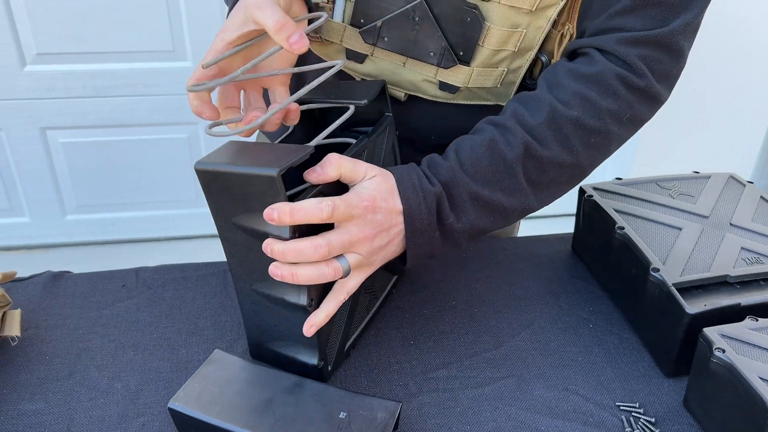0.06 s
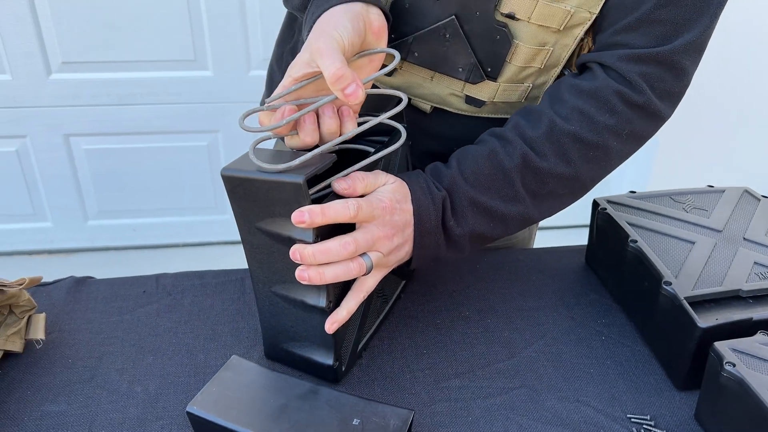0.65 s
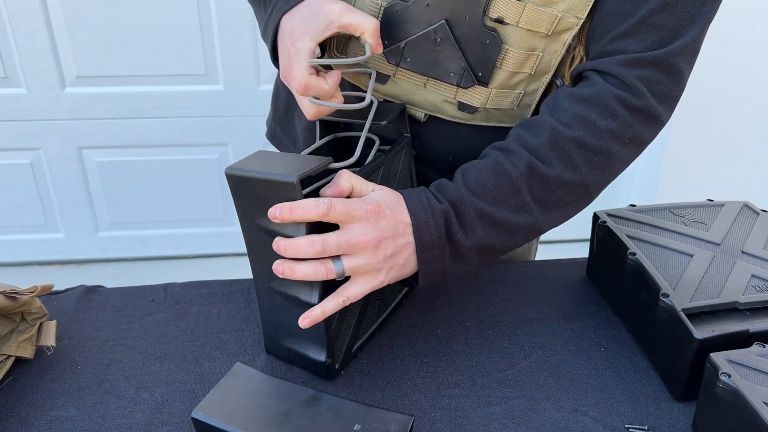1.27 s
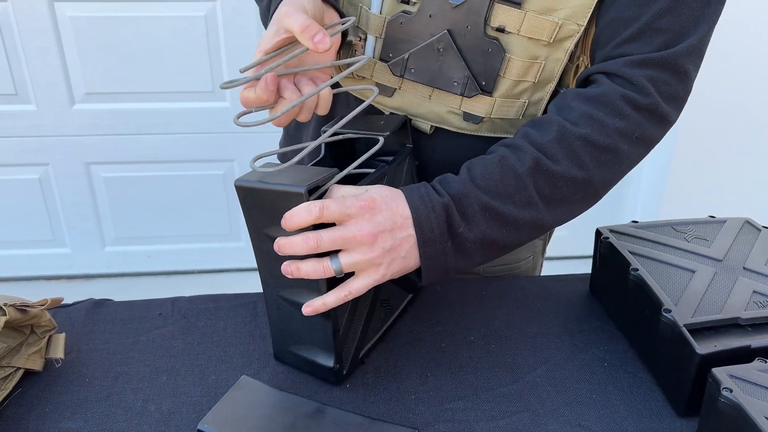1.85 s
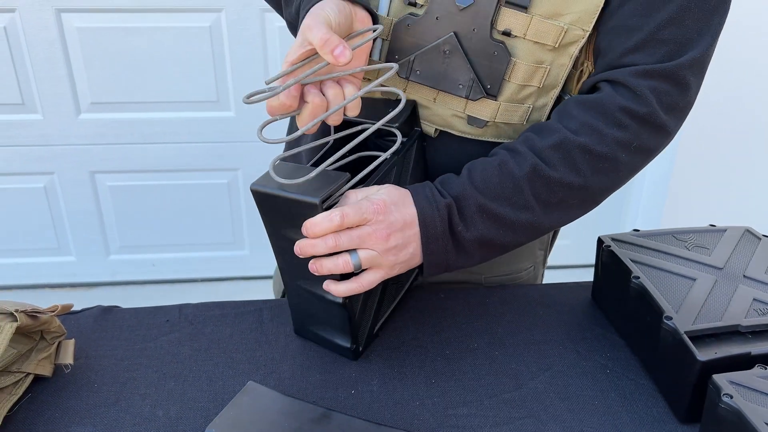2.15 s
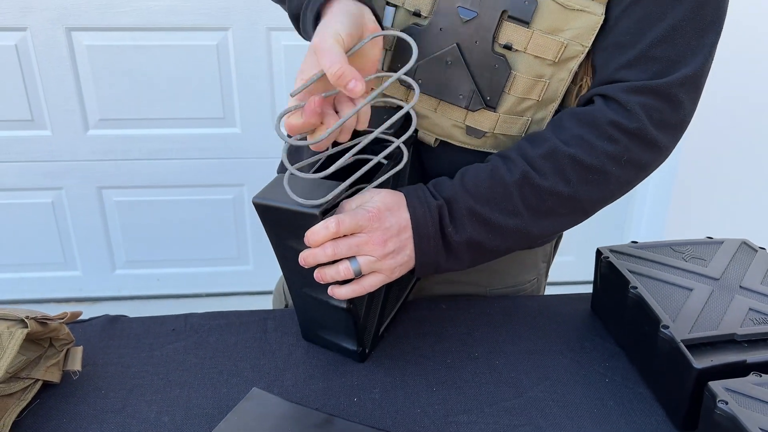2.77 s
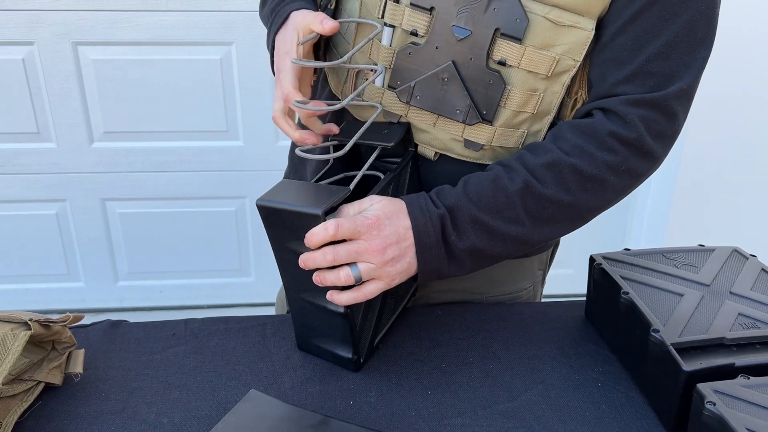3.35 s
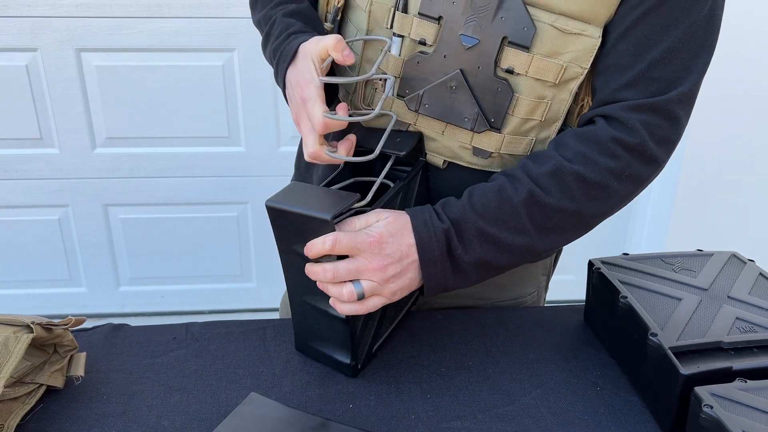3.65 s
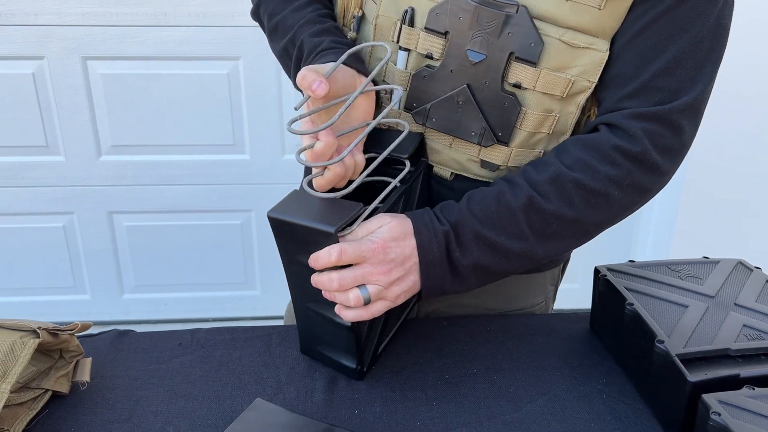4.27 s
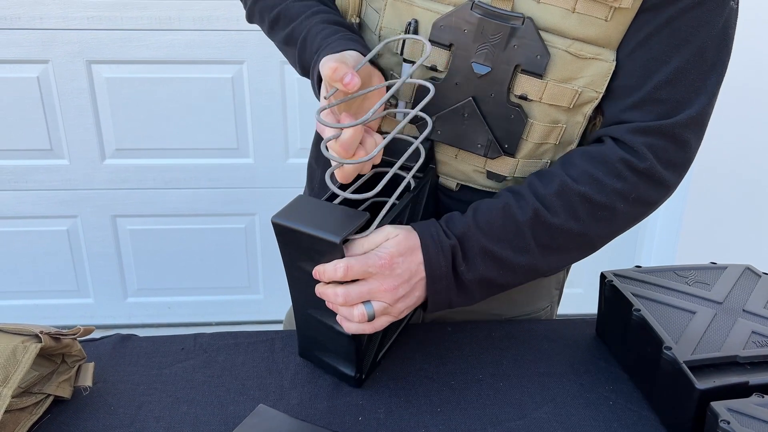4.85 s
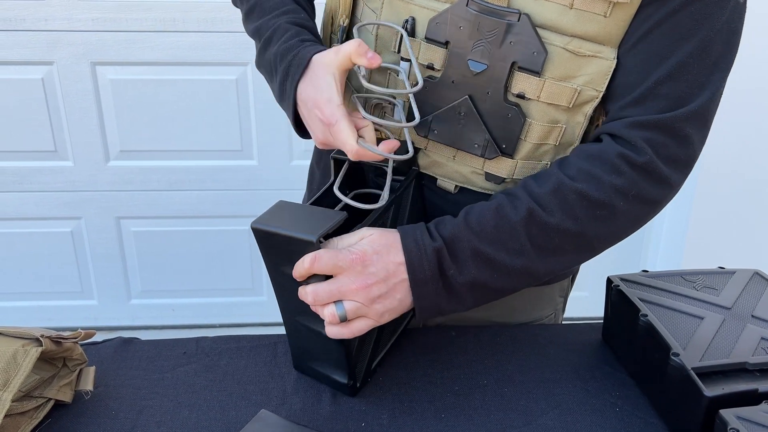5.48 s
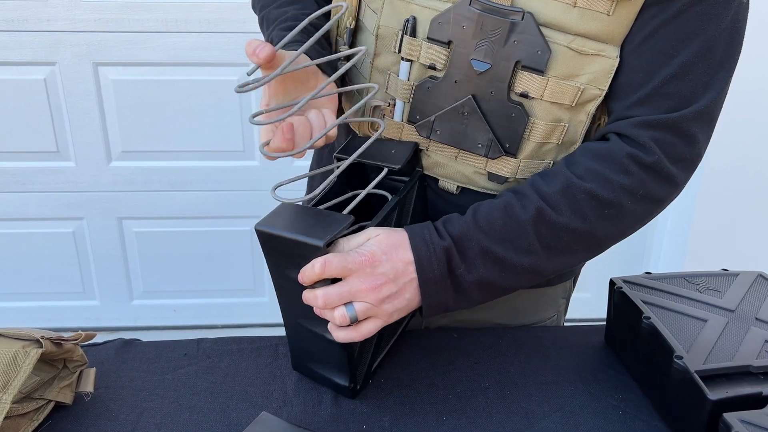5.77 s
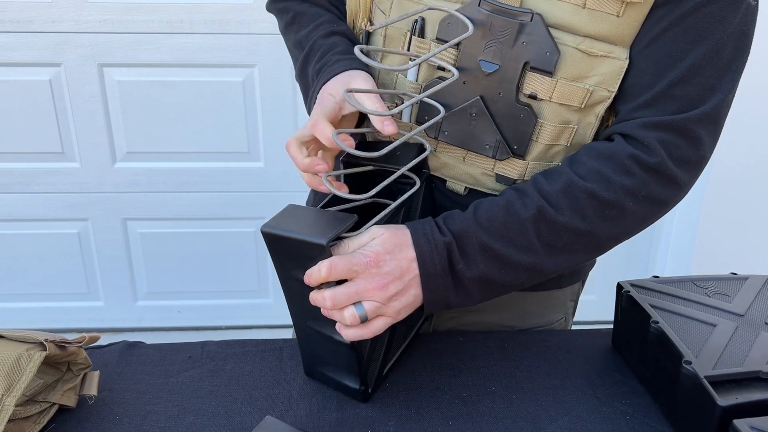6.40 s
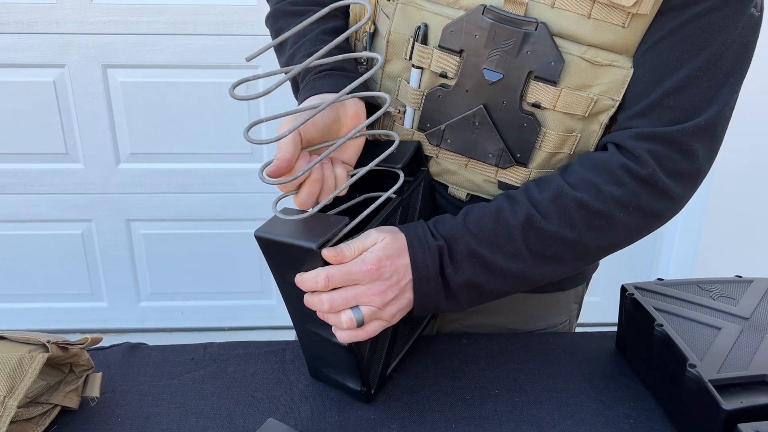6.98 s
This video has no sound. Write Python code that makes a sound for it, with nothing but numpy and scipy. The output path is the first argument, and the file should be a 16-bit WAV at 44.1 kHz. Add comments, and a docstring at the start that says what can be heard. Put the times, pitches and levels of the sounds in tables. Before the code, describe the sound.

Clusters of clicks, hollow knocks and scrapes as metal coils catch on a plastic box and snap free, pulled by hand.

```python
"""Ticks, clacks and hollow booms come in clusters over a scrape: a long steel wire spring is being
rocked and drawn by hand out of a hollow plastic housing, outdoors. Its coils slide along the walls by
stick-slip friction, catch on the rim and snap free. Each impact excites the damped modes of the plastic,
the resonance of the cavity and, faintly, the modes of the wire. Hands rumble and a sleeve rustles."""
import sys
import numpy as np
from scipy import signal
from scipy.fft import rfft, irfft, next_fast_len
from scipy.io import wavfile
from scipy.ndimage import uniform_filter1d, map_coordinates

SR = 44100
rng = np.random.default_rng(int(sys.argv[2]) if len(sys.argv) > 2 else 0)


def dump_mix(stems):
    """Bounce the given channels to the path in sys.argv[1] as a 16-bit WAV at rate SR."""
    frames = np.atleast_2d(stems).T  # one column per channel
    limited = np.clip(frames, -1, 1)  # hard clip at full scale
    pcm = np.round(limited * 32767).astype(np.int16)
    wavfile.write(sys.argv[1], SR, pcm)


N = 314433

# impacts of a coil on the housing: t/s, boom f/Hz, boom level/dB, clack level/dB, tick over clack/dB
CONTACTS = [(0.045, 333, -29, -29.5, -9.5), (0.0494, 354, -20.5, -25, -12), (0.0635, 285, -29.5, -32, -32),
            (0.1491, 340, -33.5, -35.5, -21), (0.1784, 319, -18, -22.5, -8.5),
            (0.202, 358, -31.5, -43.5, -11), (.302, 338, -46, -65, -1), (0.7426, 332, -46, -53, -16),
            (0.9473, 360, -23, -27, -10), (1.0037, 331, -37, -29.5, -11.5), (1.021, 315, -23, -33, -11),
            (1.0471, 365, -35, -25.5, -3.5), (1.0595, 330, -27.5, -30.5, -16),
            (1.0825, 370, -33, -24, -13.5), (1.1017, 345, -29, -26, -12), (1.1292, 350, -37, -41, -19),
            (1.1879, 351, -22, -22, -9), (1.1929, 326, -33.5, -30, -3.5), (1.2092, 361, -29, -29.5, -19),
            (1.236, 340, -37.5, -32, -5), (1.2769, 338, -29, -33.5, -10.5), (1.2874, 352, -27.5, -39.5, -5),
            (1.3315, 383, -35.5, -29.5, -8.5), (1.406, 310, -42.5, -33, -21), (1.4346, 288, -21.5, -26, -9),
            (1.4441, 315, -28.5, -27, -6.5), (1.4576, 337, -23.5, -27.5, -3.5),
            (1.467, 339, -25, -28.5, -9), (1.4926, 341, -22.5, -33.5, -9), (1.5206, 332, -23, -44.5, 2),
            (1.5441, 397, -26.5, -36.5, -14), (1.58, 286, -22.5, -34.5, -8),
            (1.5895, 305, -21, -22.5, -5.5), (1.6081, 377, -27, -30, -18),
            (1.6167, 356, -22.5, -31.5, -8.5), (1.6493, 347, -37, -42, 1.5), (1.6636, 362, -32.5, -41, -6),
            (1.7079, 353, -34, -32.5, -13.5), (1.7282, 380, -38, -39, -22), (1.817, 353, -52.5, -42.5, -28),
            (1.91, 308, -23.5, -30.5, -12.5), (2.231, 337, -42, -68, -14), (2.3647, 290, -42, -42.5, -10.5),
            (2.3932, 343.4, -25, -31, -12), (2.4011, 344.5, -20, -40, -11), (2.629, 362, -25, -45, -8.5),
            (2.6427, 370, -25.5, -43.5, -16.5), (2.6599, 339.5, -24.5, -62.5, -14),
            (2.854, 344, -29, -26.5, -5.5), (2.8747, 318, -25.5, -33.5, -18), (2.921, 346, -23.5, -47, -1),
            (2.9297, 343, -19, -24.5, -6), (2.9637, 360, -28.5, -33.5, -14.5),
            (3.0206, 390, -39.5, -47.5, -24), (3.0951, 302, -38.5, -40, -16.5), (3.1664, 310, -67, -52, 2),
            (3.2235, 306, -35, -35, -14), (3.2453, 340, -34, -41.5, -34), (3.3216, 320.6, -27, -31, -12.5),
            (3.419, 365, -37, -45, -20), (3.555, 346, -36, -41.5, -19), (3.5816, 324, -23, -31, -9.5),
            (3.6977, 353, -34.5, -41, -14.5), (3.7132, 354, -27, -37.5, -21), (4.1509, 366, -17.5, -23, -8),
            (4.214, 311, -37.5, -47, -14), (4.2322, 320, -37, -50, -17), (4.3439, 298, -46, -58, -36),
            (4.408, 339, -21.5, -24.5, -5.5), (4.4124, 358.6, -15.5, -38, -1.5),
            (4.447, 366, -27.5, -49, -15), (4.601, 319, -35.5, -52, -12), (4.6385, 308.6, -21, -51.5, -6),
            (4.8908, 325, -30.5, -40.5, -24), (4.9305, 330, -29, -45.5, -8), (4.9621, 347, -22, -24, -9.5),
            (4.9882, 320, -20.5, -31, -16.5), (5.056, 362, -24.5, -30.5, -8.5),
            (5.062, 365, -24, -34.5, -17.5), (5.0897, 360, -43, -34, -13), (5.1082, 362, -28.5, -43.5, -15),
            (5.1518, 360, -27.5, -38.5, -7), (5.1969, 339, -33.5, -45, -9.5),
            (5.3674, 352, -54.5, -27.5, -12), (5.4019, 335, -17.5, -22.5, -8),
            (5.4311, 355.4, -17.5, -26.5, -4.5), (5.4436, 355, -21.5, -28, -8.5),
            (5.453, 362, -20, -35, -7), (5.6061, 351, -24, -32, -4), (5.6192, 384, -24, -32, -6.5),
            (5.6305, 331, -20, -27, 0), (5.6453, 380, -22.5, -31.5, -12), (5.6659, 326, -21.5, -33, -7),
            (5.6905, 327, -24, -33, -9), (5.7505, 365, -30, -40, -10), (5.7779, 408, -30.5, -31, -9),
            (5.887, 309, -28.5, -35.5, -10.5), (5.9258, 330, -34.5, -46.5, -19),
            (6.0226, 365, -44.5, -43.5, -19.5), (6.061, 356, -32.5, -55.5, -17),
            (6.097, 337, -45, -54.5, -30), (6.1572, 357, -25, -37, -14.5), (6.213, 323, -30, -38.5, -13),
            (6.2323, 340, -32.5, -26.5, -1.5), (6.237, 356, -40, -26, -4.5), (6.2459, 380, -25, -31, -2),
            (6.2557, 370, -32, -35.5, -4), (6.2977, 352, -21, -30, -5), (6.6184, 362, -47, -54.5, -16),
            (6.725, 300, -49, -57, -14), (6.7816, 350, -36.5, -52.5, -14), (6.8362, 385, -30, -29.5, -12),
            (6.8476, 348, -15.5, -28, -5.5), (6.8664, 321, -23.5, -39.5, -7.5),
            (6.9091, 344.5, -22.5, -24, -7), (7.0155, 338.4, -32.5, -48, -16)]


def amp(db):
    return 10 ** (np.asarray(db) / 20)


def unit(x):
    return x / np.sqrt(np.mean(x ** 2) + 1e-20)


def burst(x):
    """Energy normalisation: a short sound gets the energy of 10 ms at rms 1."""
    return x / np.sqrt(np.mean(np.sum(x ** 2, axis=-1)) / (SR / 100) + 1e-20)


def along(points, hz):
    """Interpolation of (f/Hz, value) points on a logarithmic frequency axis."""
    f, values = np.transpose(points)
    return np.interp(np.log(hz + 1), np.log(f + 1), values)


def curves(rows):
    """Linear interpolation in time: one value per sample for each column after t/s."""
    times, *columns = np.transpose(rows)
    return [np.interp(np.arange(N) / SR, times, column) for column in columns]


def wobble(rate):
    """Slow random modulation: a spline through `rate` Gaussian knots a second."""
    return map_coordinates(rng.standard_normal(int(N * rate / SR) + 4), [np.arange(N) * rate / SR])


def add(track, start_s, sound):
    """Superposition of a sound on a track from start_s on."""
    start = max(0, round(start_s * SR))
    span = track[..., start:start + sound.shape[-1]]
    span += sound[..., :span.shape[-1]]


def swells(times, levels_db, before_s, after_s):
    """Incoherent addition: exponential rises and decays around each event sum in power."""
    t = np.arange(-(SR // 4), SR // 4) / SR
    shape = np.exp(np.minimum(t / before_s, -t / after_s))
    power = np.zeros(N)
    for s, db in zip(times, levels_db):
        early = max(0, -round((s + t[0]) * SR))
        add(power, s + t[0], (amp(db) * shape[early:]) ** 2)
    return np.sqrt(power)


def coloured(pair, spectrum, ripple_db=0):
    """Minimum-phase filtering of two independent signals, mixed to a partly coherent left and right."""
    # likeness of left and right: f/Hz, coherence
    coherence = [(50, 0.88), (300, 1), (600, 0.98), (1200, 0.81), (2300, 1), (3100, 0.33), (4500, 0.59),
                 (8000, 0.88), (11500, 0.68)]
    n = pair.shape[-1]
    m = 2 * next_fast_len(n // 2 + 512)
    hz = np.fft.rfftfreq(m, 1 / SR)
    cepstrum = irfft(np.log(amp(along(spectrum, hz))))
    if ripple_db:
        # each point of contact favours other resonances, a hundred Hz or so wide
        bumps = rng.standard_normal((len(pair), 1, m)) * np.exp(-(np.arange(m) / (0.0064 * SR)) ** 2)
        bumps /= np.sqrt(2 * np.sum(bumps ** 2, axis=-1, keepdims=True))
        cepstrum = cepstrum + np.log(amp(ripple_db)) * bumps
    cepstrum[..., 1:m // 2] *= 2  # folding the cepstrum makes the filter causal
    cepstrum[..., m // 2 + 1:] = 0
    filtered = rfft(pair, m) * np.exp(rfft(cepstrum))
    angle = np.arccos(np.clip(along(coherence, hz), -1, 1)) / 2
    mid, side = filtered[..., 0, :] * np.cos(angle), filtered[..., 1, :] * np.sin(angle)
    return irfft(np.stack([mid + side, mid - side], axis=-2), m)[..., :n]


def patchy(x, depth_db):
    """Moving excitation: resonances come and go at random as the point of contact travels."""
    frames = signal.stft(x, nperseg=1024)[2]
    field = uniform_filter1d(rng.standard_normal(frames.shape[1:]), size=3, axis=0)
    field = uniform_filter1d(field, size=7, axis=1)
    return signal.istft(frames * amp(depth_db * unit(field)), nperseg=1024)[1][:, :N]


def strokes(rows, spectrum, patchy_db):
    """Friction noise follows the sliding speed, a half sine for each stroke."""
    speed = np.zeros(N)
    for start, end, db in rows:
        add(speed, start, amp(db) * np.sin(np.linspace(0, np.pi, int((end - start) * SR))))
    noise = coloured(rng.standard_normal((2, N)), spectrum)
    return speed * unit(patchy(noise, patchy_db))


def yard_echo(x, wet_db):
    """Reverberation: reflections from a door and walls decay at a rate that depends on frequency."""
    # reverberation time: f/Hz, t60/s
    decay = [(200, 0.35), (1500, 0.17), (5000, 0.15), (11000, 0.11)]
    hz, t, frames = signal.stft(rng.standard_normal((2, SR // 2)), SR, nperseg=256)
    tail = signal.istft(frames * amp(-60 * t / along(decay, hz)[:, None]), SR, nperseg=256)[1]
    onset = 1 - np.exp(-np.arange(tail.shape[1]) / (0.0028 * SR))
    tail = coloured(tail * onset, [(100, 0.011), (10000, 0)])
    tail /= np.linalg.norm(tail[0])
    return amp(wet_db) * signal.fftconvolve(x.mean(axis=0)[None], tail, axes=1)[:, :N]


def handling_rumble():
    """Structure-borne sound: grip, booms and shoves shift the housing on a cloth-covered table."""
    # restlessness of the hand: t/s, level/dB
    grip = [(0, -62), (.45, -48.5), (.58, -57.5), (.95, -52.5), (1.62, -54.5), (1.78, -60), (1.9, -49.5),
            (4.05, -52), (4.55, -52.5), (4.8, -43), (5.15, -52), (5.6, -50), (5.74, -74), (6.02, -61),
            (6.17, -49), (6.35, -53.5), (6.46, -64), (6.68, -69), (6.79, -48)]
    # the housing rocks heavily: start t/s, end t/s, level/dB
    shoves = [(0.622, 0.873, -42.5), (1.408, 1.568, -40), (2.033, 2.127, -52), (3.224, 3.325, -42),
              (4.633, 4.717, -42), (5.553, 5.678, -49)]
    # spectrum of the rumble: f/Hz, level/dB
    rumble = [(15, -25.5), (30, -9), (55, 4.5), (85, 3.5), (120, -2), (180, -4.5), (240, -12.5), (400, -19),
              (700, -56.5)]
    times, _, boom_db, _, _ = np.transpose(CONTACTS)
    lumps = amp(2.4 * wobble(24)) * rng.standard_normal((2, N))
    thumps = swells(times, boom_db - 32, before_s=0.0071, after_s=0.025)
    push = np.hypot(amp(curves(grip)[0]), thumps)
    for start, end, db in shoves:
        add(push, start, amp(db) * np.hanning(int((end - start) * SR)))
    return push * unit(coloured(lumps, rumble))


def sleeve_rustle():
    """Friction of cloth on cloth: a sleeve brushing a vest radiates broadband noise."""
    # strokes of the sleeve: start t/s, end t/s, level/dB
    swishes = [(1.97, 2.196, -59.5), (2.195, 2.327, -64), (3.1, 3.31, -57.5), (3.73, 3.9, -58.5),
               (3.937, 4.09, -60), (4.167, 4.265, -60), (4.54, 4.655, -59.5), (4.662, 4.762, -56),
               (4.83, 5.0, -51.5), (6.483, 6.57, -63.5), (6.79, 6.857, -54)]
    # spectrum of the cloth: f/Hz, level/dB
    cloth = [(200, -7), (600, 7.5), (1300, 10.5), (2500, 5), (3500, 0), (7500, -4), (8700, -8), (9600, -31),
             (12000, -65.5)]
    return strokes(swishes, cloth, patchy_db=4.5)


def bowed_wire():
    """Frictional excitation: bowed by the rim, the wire sings faintly in two narrow bands of noise."""
    # strokes of the rim: start t/s, end t/s, level/dB
    bowing = [(1.0, 1.35, -55), (1.93, 2.26, -72.5), (4.15, 4.28, -66), (4.93, 5.29, -60.5)]
    # spectrum of the singing wire: f/Hz, level/dB
    resonances = [(2900, -28.5), (3280, -9), (3360, 4), (3430, -25), (3490, 7), (3580, -9), (4000, -27.5),
                  (6000, -40.5)]
    return strokes(bowing, resonances, patchy_db=2.5)


def coil_scrape(slips_per_s, spread_db, steady_force, hiss_db, patchy_db, grip_db):
    """Stick-slip friction: tiny slips of wire on plastic excite the cavity and the walls."""
    # the coils lean and creep on the walls: t/s, hum level/dB, rasp level/dB
    pressure = [(0, -46.5, -60.5), (.3, -61, -62.5), (.58, -69, -71), (.9, -69, -71.5), (1.05, -46, -54),
                (1.8, -45, -56), (2.0, -55.5, -65), (2.2, -66, -69), (2.5, -53, -73), (2.75, -56.5, -72),
                (3.25, -50, -58.5), (3.95, -62, -72.5), (4.25, -53.5, -62), (4.55, -54, -72),
                (5.1, -54, -63), (6.3, -54, -64.5), (6.5, -54.5, -71), (6.75, -50.5, -67),
                (7.13, -61, -70.5)]
    # a coil is dragged over the rim: start t/s, end t/s, level/dB
    drags = [(0.084, 0.175, -50), (0.964, 1.183, -41.5), (1.192, 1.381, -43.5), (1.413, 1.683, -38),
             (1.657, 1.795, -50.5), (2.86, 2.98, -45), (4.91, 5.182, -47.5), (5.38, 5.505, -40.5),
             (5.563, 5.805, -48.5), (6.22, 6.309, -39.5), (6.597, 6.68, -61.5), (6.84, 6.944, -43.5)]
    # spectra of the cavity's hum, the walls' rasp and the hiss above it: f/Hz, level/dB
    cavity = [(100, -32.5), (200, -11.5), (260, -5.5), (310, -0.5), (360, 6.5), (420, -5), (520, -18),
              (800, -56.5)]
    walls = [(300, -23), (520, -9.5), (720, 1), (980, 7.5), (1250, 7.5), (1500, -0.5), (2000, 0.5),
             (2650, -2.5), (3200, -10.5), (4500, -38.5)]
    hiss = [(2200, -11), (3400, 11), (4200, 7.5), (7000, 2), (8500, -2), (9400, -27), (11400, -17),
            (12400, -43.5)]
    t = np.arange(N) / SR
    times, _, boom_db, clack_db, _ = np.transpose(CONTACTS)
    creep_hum, creep_rasp = amp(np.array(curves(pressure)) + 2.5 * wobble(12))
    hum = np.hypot(creep_hum, swells(times, boom_db - 23, before_s=0.014, after_s=0.05))
    ramp_s, slip_decay_s = 0.022, 0.0051
    dragging = sum(amp(db) * np.clip(np.minimum(t - start, end - t) / ramp_s, 0, 1)
                   for start, end, db in drags)
    # the coil also rubs on its way into and out of each impact
    friction = np.hypot(dragging, swells(times, clack_db - 23.5, before_s=0.024, after_s=0.013))
    slipping = rng.random(N) < slips_per_s / SR
    slips = slipping * amp(spread_db * np.clip(rng.standard_normal(N), -2, 2))
    slip_power = signal.lfilter([1], [1, -np.exp(-1 / (slip_decay_s * SR))], slips ** 2)
    force = np.sqrt(steady_force ** 2 + unit(slip_power)) * amp(grip_db * wobble(22))

    def rub(spectrum):
        return unit(coloured(force * rng.standard_normal((2, N)), spectrum))

    rasp = unit(patchy(rub(walls) + amp(hiss_db) * rub(hiss), patchy_db))
    return np.hypot(hum, friction) * rub(cavity) + np.hypot(creep_rasp, friction) * rasp


def wire_ring(ring_db, scatter_db):
    """Free vibration: each impact rings the modes of the hand-damped wire at new random strengths."""
    # modes of the spring: f/Hz, level/dB, t60/s
    wire_modes = [(288.7, 19.5, 0.18), (361, 12, 0.4), (404, -6.5, 0.19), (722, 1, 0.2), (990, -6.5, 0.1),
                  (1243, -4, 0.29), (1710, -8, .36), (2030, -11, 0.24), (2270, -8, 0.51), (2770, -4.5, .18),
                  (2980, -10.5, 0.44), (3340, -11, 0.23), (5100, -16.5, 0.1), (7640, -23.5, .36)]
    t = np.arange(SR // 2) / SR
    hz, db, t60 = np.transpose(wire_modes)
    t60 = np.minimum(t60, 0.4)  # the hand cuts the longest decays short
    modes = amp(db[:, None] - 60 * t / t60[:, None]) * np.sin(2 * np.pi * hz[:, None] * t)
    chance = rng.standard_normal((len(CONTACTS), 2, len(hz)))
    strengths = np.sign(chance[:, 0]) * amp(scatter_db * chance[:, 1])
    out = np.zeros(N)
    for (s, _, _, clack_db, _), ring in zip(CONTACTS, strengths @ modes):
        add(out, s, amp(ring_db + clack_db) * ring)
    return out


def cavity_boom(swell_s, lag_s, roundness, ring_db, ring_t60):
    """Cavity resonance: a tone builds over a few cycles after each impact, its pitch set by the grip."""
    t = np.arange(SR // 5) / SR
    push = (t / swell_s * np.exp(1 - t / swell_s)) ** roundness
    ring = amp(ring_db - 60 * t / ring_t60) * (1 - np.exp(-t / swell_s)) ** 2
    out = np.zeros(N)
    for s, hz, db, *_ in CONTACTS:
        add(out, s + lag_s, amp(db) * burst((push + ring) * np.sin(2 * np.pi * hz * t)))
    return out


def impacts(levels_db, spectrum, t60, crack, rise_s, smear_s, shared, scuff_db, ripple_db):
    """Modal overlap: dense, damped modes act as decaying noise, part shared, part new at each impact."""
    lead_s = 0.005
    t = np.arange(SR // 8) / SR - lead_s
    after = np.maximum(t, 0)
    common = np.sqrt(shared) * rng.standard_normal((2, len(t)))
    fresh = np.sqrt(1 - shared) * rng.standard_normal((len(levels_db), 2, len(t)))
    # hard blows crack; light ones that follow closely on another smear into a scrape
    hardness = amp(0.26 * (levels_db - levels_db.max()))[:, None, None]
    gap_s = np.diff(np.transpose(CONTACTS)[0], prepend=-1)[:, None, None]
    attack_s = rise_s + smear_s * (1 - hardness) * np.exp(-gap_s / 0.11)
    onset = 1 - np.exp(-after / attack_s)
    decay = amp(-60 * after / t60) + crack * hardness * amp(-60 * after / 0.0069)
    # the coil starts to slip just before it snaps free
    scuff = amp(scuff_db - 60 * np.abs(t) / 0.013)
    sounds = coloured((common + fresh) * (onset * decay + scuff), spectrum, ripple_db)
    out = np.zeros((2, N))
    for (s, *_), db, sound in zip(CONTACTS, levels_db, sounds):
        add(out, s - lead_s, amp(db) * burst(sound))
    return out


def coil_clacks():
    """Impact excitation: a coil strikes the housing; the walls and rim clack and the wire ticks."""
    # spectra of the struck walls, rim and wire: f/Hz, level/dB
    wall_spectrum = [(150, -27), (450, -3.5), (620, -8.5), (760, -11.5), (880, -3), (980, 4), (1090, -4),
                     (1240, 6.5), (1400, -3), (1580, -17), (1800, -24), (3000, -58)]
    rim_spectrum = [(1100, -20.5), (1500, -3), (1700, -1), (1950, -2), (2150, -7.5), (2400, -3), (2900, -7),
                    (3150, -9), (3600, -28), (6000, -82)]
    tick_spectrum = [(2300, -49), (3300, 3), (3600, 5), (4100, 0.5), (5050, 1), (5600, -5), (6800, -0.5),
                     (8300, -5.5), (9200, -10), (10100, -19.5), (11400, -14.5), (12400, -33.5)]
    _, _, _, clack_db, edge_db = np.transpose(CONTACTS)
    shift_db = 0.13 * edge_db  # a sharper edge moves the clack from wall to rim
    wall = impacts(clack_db - 0.5 - shift_db, wall_spectrum, t60=0.093, crack=1.5,
                   rise_s=0.00039, smear_s=0.0017, shared=0.2, scuff_db=-20.5, ripple_db=4.5)
    rim = impacts(clack_db + shift_db, rim_spectrum, t60=0.066, crack=3.5,
                  rise_s=0.0006, smear_s=0.007, shared=0.15, scuff_db=-14, ripple_db=4)
    tick = impacts(clack_db + edge_db, tick_spectrum, t60=0.068, crack=9.5,
                   rise_s=0.0003, smear_s=0.0085, shared=0.51, scuff_db=-3.5, ripple_db=3)
    return wall + rim + tick


def scene():
    """Superposition: the impacts and their faint echo sound over the friction noises and the rumble."""
    contacts = coil_clacks()
    contacts += cavity_boom(swell_s=0.0055, lag_s=0.00047, roundness=1.95, ring_db=-4.5, ring_t60=0.11)
    contacts += wire_ring(ring_db=-26.5, scatter_db=3.5)
    scrape = coil_scrape(slips_per_s=280, spread_db=3.5, steady_force=0.6,
                         hiss_db=-13, patchy_db=3.7, grip_db=1.5)
    friction = scrape + bowed_wire() + sleeve_rustle()
    return contacts + yard_echo(contacts, wet_db=-21.5) + friction + handling_rumble()


def record(dry):
    """Two-port pickup: treble level and phase differ by side; peaks saturate and the band is limited."""
    # left port over right: f/Hz, level/dB
    imbalance = [(1100, 1.5), (1600, 1.5), (2400, -1.5), (3700, 4), (5500, 9), (8400, -1.5), (11000, 0)]
    # lead of the left port: f/Hz, phase/rad
    phase_lead = [(1290, .15), (2410, 0), (3100, 1.6), (3700, .9), (6100, .7), (6900, .1), (8600, -.5),
                  (9300, -3), (10700, -3.5), (11200, -5.8), (12000, -6.3)]
    ceiling, cutoff_hz = 0.4, 12200
    m = next_fast_len(N + SR // 2)
    hz = np.fft.rfftfreq(m, 1 / SR)
    shadow = np.clip((hz - 400) / 600, 0, 1)  # the ports are alike below 400 Hz
    sides = np.array([[0.5], [-0.5]]) * shadow
    ports = amp(sides * along(imbalance, hz)) * np.exp(1j * sides * along(phase_lead, hz))
    pair = irfft(rfft(dry, m) * ports, m)
    rounded = pair / (1 + np.abs(pair / ceiling) ** 6) ** (1 / 6)
    low_pass = 1 / np.sqrt(1 + (hz / cutoff_hz) ** 80)
    return irfft(rfft(rounded) * low_pass, m)[:, :N]


dry = scene()
out = record(dry)
dump_mix(out)
```